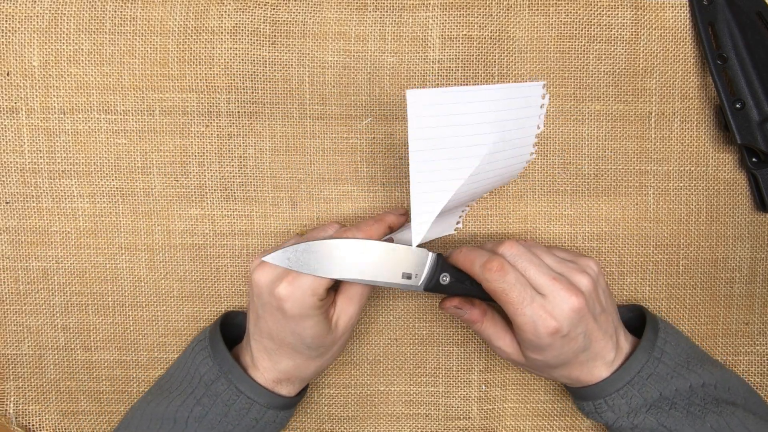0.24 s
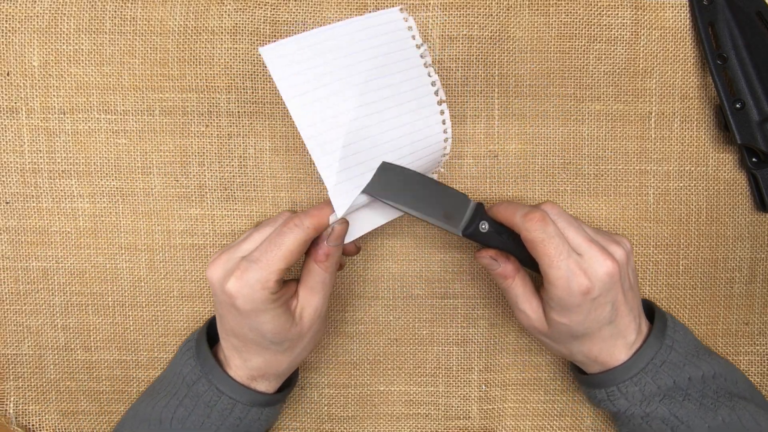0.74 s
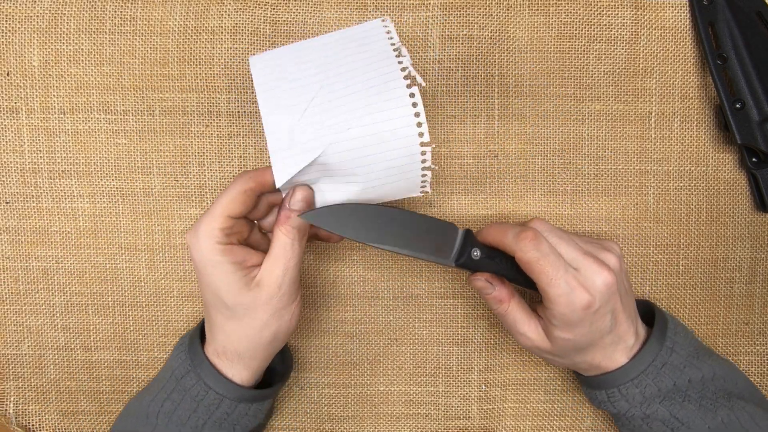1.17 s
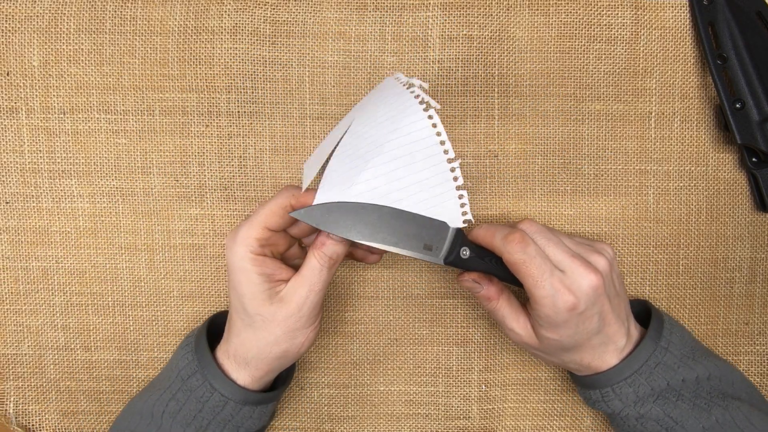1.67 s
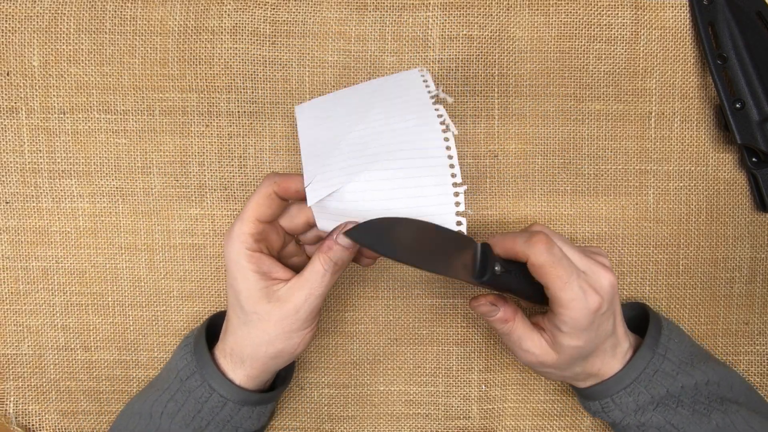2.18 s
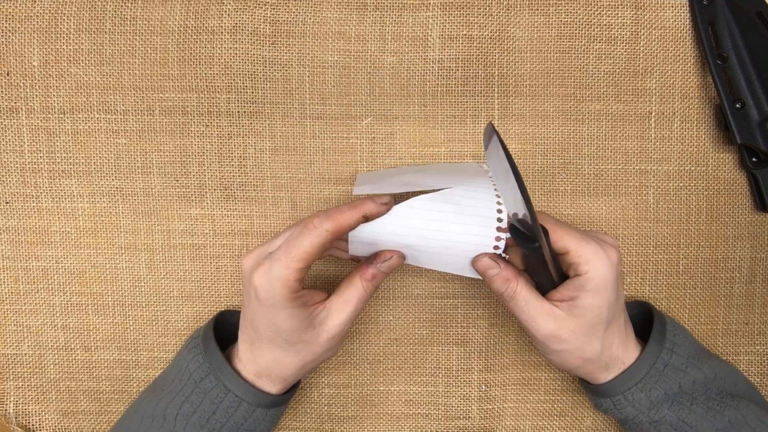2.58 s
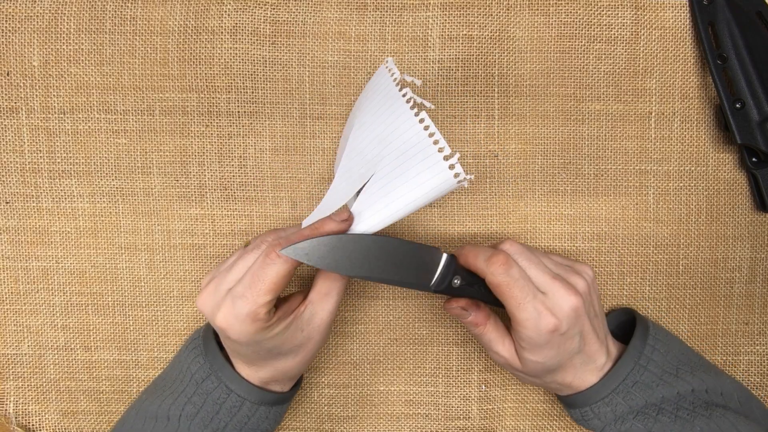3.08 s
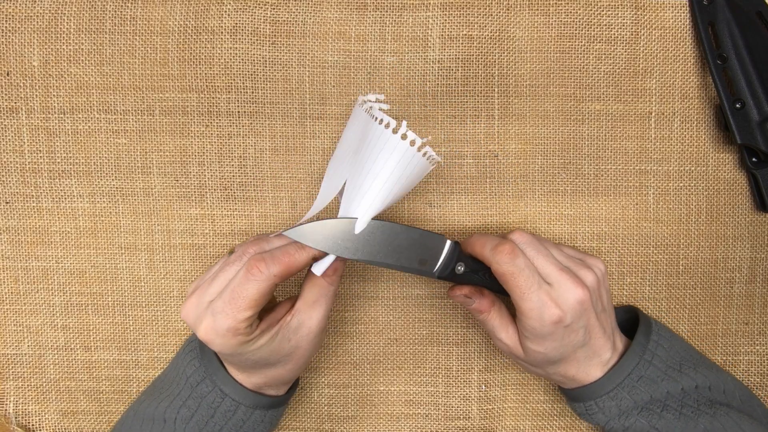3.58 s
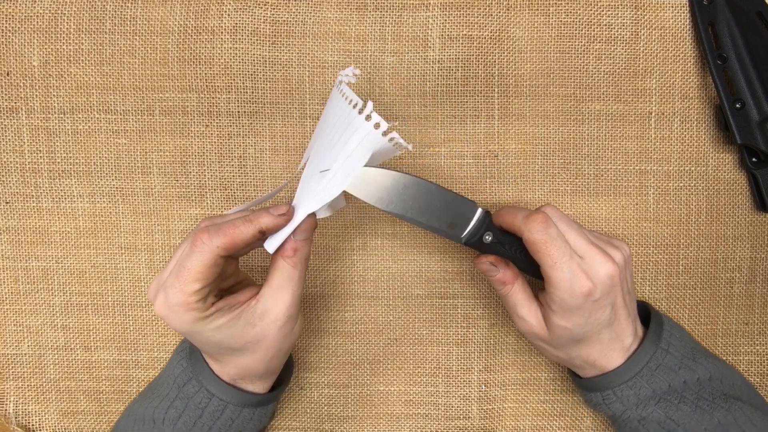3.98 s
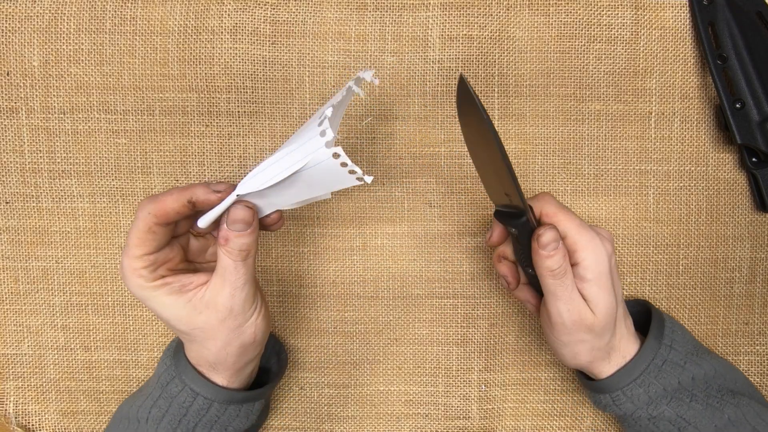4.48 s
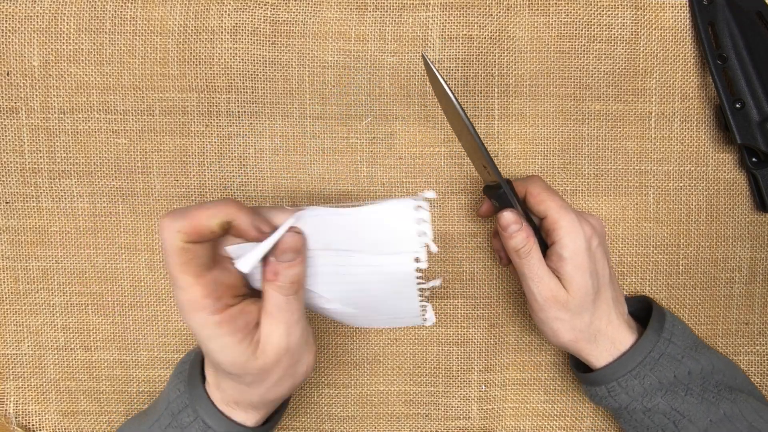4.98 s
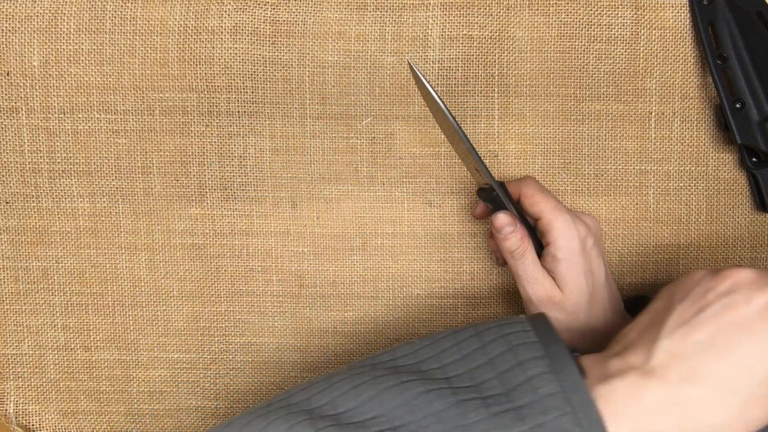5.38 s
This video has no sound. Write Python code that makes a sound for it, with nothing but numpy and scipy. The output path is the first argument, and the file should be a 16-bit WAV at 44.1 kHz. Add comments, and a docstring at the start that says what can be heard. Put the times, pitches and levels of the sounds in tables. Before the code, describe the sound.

A knife slices a hand-held sheet of notebook paper twice in crisp, rasping strokes, with paper rustling and crinkling pops between, in a quiet room.

```python
"""A low rumble with a hum lies under everything in a small room: shaped noise that swells with the arms, plus sines.
Fingers slide over a hand-held sheet of notebook paper, which rustles as dense random grains and buckles in noise pops.
Over a cloth-covered table a knife slices the sheet twice: each edge snaps fibres, heard as coloured crackle, and
rings the sheet's resonances less and less as the cut slackens it. A close pair of microphones hears it all."""
import sys
import numpy as np
from scipy import signal
from scipy.fft import rfft, irfft, next_fast_len
from scipy.io import wavfile
from scipy.ndimage import map_coordinates

SR = 44100
rng = np.random.default_rng(int(sys.argv[2]) if len(sys.argv) > 2 else 0)


def log_audio(samples):
    """Write samples as a 16-bit WAV file to the path given in sys.argv[1]."""
    # one column per channel
    frames = np.atleast_2d(samples).T
    # limit to full scale, then quantise
    limited = np.clip(frames, -1, 1)
    pcm = np.round(limited * 32767).astype(np.int16)
    wavfile.write(sys.argv[1], SR, pcm)


N = 248708
TIME = np.arange(N) / SR  # seconds


def amp(db):
    """Decibels to gain."""
    return 10 ** (np.asarray(db) / 20)


def unit(x):
    """Scale a sound to rms 1."""
    return x / np.sqrt(np.mean(x ** 2) + 1e-20)


def along(points, hz):
    """Read a curve of (frequency, value) points on a log frequency axis."""
    point_hz, values = np.transpose(points)
    return np.interp(np.log(hz + 1), np.log(point_hz + 1), values)


def wobble(rate):
    """A smooth random curve through `rate` knots a second, swinging about zero."""
    knots = rng.standard_normal(int(N * rate / SR) + 4)
    coarse_time = TIME[::32]
    return np.interp(TIME, coarse_time, map_coordinates(knots, [coarse_time * rate]))


def filtered(x, response):
    """Multiply the spectrum of x by a complex response of frequency."""
    n = x.shape[-1]
    padded = next_fast_len(n + 4096)
    spectrum = rfft(x, padded) * response(np.fft.rfftfreq(padded, 1 / SR))
    return irfft(spectrum, padded)[..., :n]


def stereo(pair, spectrum, alike):
    """Colour two unrelated signals and blend them into a left and right of set likeness, at rms 1."""
    def response(hz):
        likeness = np.clip(along(alike, hz), -0.98, 0.98)
        return amp(along(spectrum, hz)) * np.sqrt(1 + np.outer([1, -1], likeness))

    mid, side = filtered(pair, response)
    return unit(np.array([mid + side, mid - side]))


# Stereo width of the quiet room: (frequency [Hz], left-right correlation [-1 to 1])
ROOM_WIDTH = [(25, 0.49), (45, 0.47), (70, 0.81), (140, 0.054), (280, 0.2), (450, -0.69), (800, -0.89),
              (1400, -0.79), (2300, -0.47), (3600, 0.35), (6000, 0.27), (8500, -0.084)]
# Colour of the deep rumble: (frequency [Hz], relative density [dB])
DEEP_COLOUR = [(12, -46), (22, -5), (42, -3.5), (52, 7), (63, -4.5), (78, -4.5), (92, 1), (110, -8.5),
               (160, -56)]
# Colour of the upper rumble: (frequency [Hz], relative density [dB])
UPPER_COLOUR = [(80, -21), (115, -6), (145, 4.5), (185, -0.5), (235, -3.5), (270, -13.5), (315, -8.5),
                (350, -17), (450, -17.5), (700, -46)]
# Colour of the thin hiss: (frequency [Hz], relative density [dB])
HISS_COLOUR = [(300, -21), (500, -5), (800, 5.5), (1100, -8.5), (1600, -6.5), (2700, -16.5), (4800, -14.5),
               (5900, -8.5), (7000, -13), (8200, -21), (11000, -29.5), (15000, -42)]
# Steady hum: (frequency [Hz], mean rms level [dB])
HUM_TONES = [(60.5, -70), (91.7, -68.5), (147.7, -67)]
# Rumble swells as the arms move: (time [s], half length [s], deep rise [dB], upper rise [dB])
ARM_MOVES = [(0.58, 0.11, 6.5, 0.5), (0.834, 0.043, 1, 6.5), (1.42, 0.14, 3.5, -5), (2.3, 1, 1, 2),
             (3.304, 0.09, 4, 1.5), (3.465, 0.053, 15, 1), (4.918, 0.16, 10, 6), (5.414, 0.25, -7, 3)]
DEEP_DB, UPPER_DB, HISS_DB = -58, -56, -62.5  # resting levels


def room_tone():
    """Lumpy low noise swells with the arms, over a slightly unsteady hum of sines and thin hiss."""
    deep_db = DEEP_DB + 2 * wobble(22)
    upper_db = UPPER_DB + 2 * wobble(30)
    for time, half_length, deep_rise_db, upper_rise_db in ARM_MOVES:
        swell = np.exp(-((TIME - time) / half_length) ** 2)
        deep_db = deep_db + deep_rise_db * swell
        upper_db = upper_db + upper_rise_db * swell

    def noise(colour):
        return stereo(rng.standard_normal((2, N)), colour, ROOM_WIDTH)

    rumble = amp(deep_db) * noise(DEEP_COLOUR) + amp(upper_db) * noise(UPPER_COLOUR)
    hum = np.zeros(N)
    for hz, db in HUM_TONES:
        tone = np.sin(2 * np.pi * hz * TIME + 0.17 * wobble(3))
        hum += amp(db + 0.4 * wobble(5.37)) * np.sqrt(2) * tone  # sqrt(2) brings a sine to rms 1
    return rumble + amp(HISS_DB) * noise(HISS_COLOUR) + hum


# Stereo width of paper and echo: (frequency [Hz], left-right correlation [-1 to 1])
PAPER_WIDTH = [(250, 0.93), (480, -0.33), (750, 0.38), (1400, 0.062), (2100, 0.62), (3200, 0.83),
               (4400, 0.98), (5300, .55), (6500, 0.43), (8000, -0.13), (9700, 0.075), (12000, 0.55)]
# Dying of the echo: (frequency [Hz], time to fall 60 dB [s])
WALL_DECAY = [(300, 0.15), (2000, 0.3), (6000, 0.38), (14000, 0.19)]
# Colour of the walls' answer: (frequency [Hz], relative level [dB])
WALL_COLOUR = [(300, 5.5), (2500, -3), (4000, -7), (6500, -1.5), (12000, -3)]


def walls(x):
    """The small room answers with decaying noise tails; four echoes take turns, a quarter second each."""
    out = np.zeros((2, N))
    turn = np.arange(N) // (SR // 4) % 4
    for part in range(4):
        hz, t, z = signal.stft(rng.standard_normal((2, SR // 2)), SR, nperseg=256)
        decay = amp(-60 * t / along(WALL_DECAY, hz)[:, None])
        tail = signal.istft(z * decay, SR, nperseg=256)[1]
        tail = stereo(tail, WALL_COLOUR, PAPER_WIDTH)
        tail = tail / np.linalg.norm(tail[0])
        tail = np.pad(tail, ((0, 0), (SR // 200, 0)))  # 5 ms before the walls answer
        source = x.mean(axis=0) * (turn == part)
        out += signal.oaconvolve(source[None], tail, axes=1)[:, :N]
    return out


def registers(x, low_hz=1400, high_hz=4800):
    """Split a sound into low, middle and high parts, each at rms 1."""
    edges = np.array([low_hz, high_hz])[:, None, None]
    low, under_high = filtered(x, lambda hz: 1 / (1 + (hz / edges) ** 10))
    return unit(low), unit(under_high - low), unit(x - under_high)


def crackle(rate, spread_db, life):
    """Tiny noise snaps, `rate` a second at random moments: most are weak, a few stand out."""
    snaps = rng.random(N) < rate / SR
    sizes = snaps * amp(spread_db * np.minimum(rng.exponential(size=N), 4))
    # snap powers add up, and each amplitude falls to 1/e in `life` seconds
    power = signal.lfilter([1], [1, -np.exp(-2 / (life * SR))], sizes ** 2)
    return unit(np.sqrt(power) * rng.standard_normal((2, N)))


# The sheet slips through the fingers and its note climbs as the free part shortens
SLIP_START_S, SLIP_END_S, SLIP_FADE_S = 1.76, 2.82, 0.2
SLIP_HZ, SLIP_CLIMB_HZ_PER_S = 2200, 480
SLIP_CONTRAST_DB = 8.5  # from the note's peak down to the far spectrum


def flexing(x, depth_db, life, slipping=False):
    """A bending sheet keeps shifting its many small resonances; one climbs while the sheet slips."""
    hz, t, z = signal.stft(x, SR, nperseg=512)
    # random bumps, one knot every two bins and every `life` seconds
    cell = np.meshgrid(np.arange(len(hz)) / 2, t / life, indexing="ij")
    db = depth_db * map_coordinates(rng.standard_normal((len(hz), 400)), cell)
    if slipping:
        note_hz = SLIP_HZ + SLIP_CLIMB_HZ_PER_S * (t - SLIP_START_S)
        fade = np.clip(np.minimum(t - SLIP_START_S, SLIP_END_S - t) / SLIP_FADE_S, 0, 1)
        peak = 1 / (1 + ((hz[:, None] - note_hz) / 260) ** 2)
        db = db + SLIP_CONTRAST_DB * fade * (peak - 0.3)  # the rest of the spectrum dips
    return signal.istft(z * amp(db), SR, nperseg=512)[1][:, :N]


# Colour of handled paper: (frequency [Hz], relative density [dB])
PAPER_COLOUR = [(200, 9.5), (450, -9), (750, 1), (1350, 3.5), (1800, -2.5), (2350, 1), (3000, 1.5),
                (3900, 2), (4800, -3), (6400, 2.5), (7600, -3), (8200, -8.5), (11000, -24), (15000, -35)]
# Colour of a crinkle or a buckle: (frequency [Hz], relative density [dB])
POP_COLOUR = [(180, 2), (450, -10), (750, -2), (1300, -3), (2200, 3.5), (3800, 3), (4800, -1), (6400, 6.5),
              (7400, -3), (8300, -12), (11000, -27), (15000, -38)]
# Fingers slide over the sheet, high and low parts relative to the middle:
# (start [s], length before release [s], level before trim [dB], low flutter [dB], hiss [dB])
FINGER_SLIDES = [(-0.03, 0.0088, -49, 0.5, -3), (0.954, 0.035, -52, -7, 5.5), (1.021, 0.032, -49.5, -5, 4),
                 (1.13, 0.091, -53.5, -11, -4), (1.598, 0.22, -49.5, -7, -3), (1.91, 0.097, -51, -11, 1.5),
                 (2.07, 0.054, -49.5, -2, 1.5), (2.196, 0.14, -52.5, -14, 0), (2.333, 0.034, -53.5, -4, 8),
                 (2.409, 0.1, -48, -1.5, -1.5), (2.521, 0.076, -55, -1, -1.5), (2.645, 0.16, -53, -7, 3),
                 (2.864, 0.1, -53.5, -5, -1.5), (3.958, 0.087, -55.5, -7, 4.5), (4.124, 0.13, -74.5, -8, 7),
                 (4.481, 0.26, -54, -5.5, 3.5), (4.82, 0.36, -54.5, -8, 1.5), (5.007, 0.055, -50, -14, 6.5),
                 (5.202, 0.17, -51.5, -9, 4), (5.363, 0.25, -51.5, -1.5, 1.5)]
SLIDE_TRIM_DB, CRINKLE_DB = -5.0, -6.5  # crinkles are relative to the grains
SLIDE_ATTACK_S, SLIDE_RELEASE_DB_PER_S = 0.023, 171


def rustle():
    """Each finger slide rises, holds and dies away: dense fine grains with a few sharper crinkles."""
    grains = stereo(crackle(rate=8100, spread_db=0.5, life=0.00085), PAPER_COLOUR, PAPER_WIDTH)
    crinkles = stereo(crackle(rate=62, spread_db=1.5, life=0.0019), POP_COLOUR, PAPER_WIDTH)
    paper = flexing(grains + amp(CRINKLE_DB) * crinkles, depth_db=3.5, life=0.04, slipping=True)
    low, middle, high = registers(paper)
    out = np.zeros((2, N))
    for start, length, db, flutter_db, hiss_db in FINGER_SLIDES:
        rise = np.clip((TIME - start) / SLIDE_ATTACK_S, 0, 1)
        fall_db = SLIDE_RELEASE_DB_PER_S * np.maximum(TIME - start - length, 0)
        texture = middle + amp(flutter_db) * low + amp(hiss_db) * high
        out += rise * amp(db + SLIDE_TRIM_DB - fall_db) * texture
    pressure = amp(1.0 * wobble(70))
    return pressure * out


# The sheet buckles, thud and crispness relative to the middle: (time [s], level before trim [dB],
# low thud [dB], crispness [dB], length before stretch [s], panel note [Hz])
CREASES = [(0.177, -57, -1, -2, 0.0083, 2520), (0.983, -41.5, -14.5, -9, 0.0011, 4160),
           (1.2093, -36, -16, -6.5, 0.0014, 3900), (1.436, -54, -4, 1.5, 0.004, 3800),
           (1.4894, -55.5, 1.5, -2, 0.012, 2340), (1.5888, -47, 5.5, -4.5, 0.0046, 2070),
           (1.627, -49.5, 0, -7, 0.0024, 2320), (1.7537, -43.5, -20, -3.5, 0.0036, 3660),
           (1.8087, -44.5, -12, 0, 0.005, 4400), (2.024, -47, -6.5, -3.5, 0.0094, 3370),
           (2.231, -51, 2, -14, 0.0034, 2360), (2.27, -44.5, -7.5, -10, 0.0068, 3570),
           (2.312, -32.5, -6, -5.5, 0.0045, 2420), (2.368, -46, -10, 3.5, 0.0028, 2400),
           (2.4537, -43, -4.5, -1, 0.0037, 2530), (2.6357, -45.5, -2, -6, 0.0043, 2500),
           (2.921, -45, -22, -5, 0.0037, 3900), (3.234, -54, -29, -7, 0.0019, 3270),
           (3.269, -50, -19, 2.5, 0.0032, 3380), (3.96, -50, -4.5, -4, 0.0029, 3370),
           (4.0417, -45.5, -12, -3, 0.0019, 3040), (4.3, -66.5, -14, 8, 0.0016, 3600),
           (4.5115, -51.5, -2.5, 0, 0.0045, 1800), (4.6733, -50.5, -12, 6.5, 0.0019, 3650),
           (4.807, -45, -1.5, -5, 0.0097, 3350), (4.823, -41, -14, -8, 0.0026, 2620),
           (4.893, -53.5, -11, 7.5, 0.0048, 3570), (4.9348, -44, -8.5, 6.5, 0.0093, 3440),
           (4.9456, -43, -10, 2, 0.0019, 2330), (4.9952, -36, -10.5, -3.5, 0.0039, 3420),
           (5.039, -43.5, -13, 8.5, 0.0013, 2290), (5.3612, -34, -10.5, -3.5, 0.0052, 3880),
           (5.493, -46, -5, 9, 0.002, 2370)]
BUCKLE_TRIM_DB = -12.5


def buckles(stretch=2.45, rise_share=0.19, shiver_db=-15, shiver_life=0.025, panel_db=4, panel_width_hz=260):
    """The sheet flips through a crease: a sharp pop rings one panel, then the whole sheet shivers briefly."""
    t = np.arange(SR // 8) / SR
    out = np.zeros((2, N + len(t)))

    def burst(shape, colour):
        return registers(stereo(shape * rng.standard_normal((2, len(t))), colour, PAPER_WIDTH))

    for time, db, thud_db, crisp_db, length, note_hz in CREASES:
        def panel(hz):
            damping = 1j * hz * panel_width_hz
            return 1 + amp(panel_db) * damping / (note_hz ** 2 - hz * hz + damping)

        onset = 1 - np.exp(-t / (rise_share * length))  # a longer crease takes longer to give way
        low, middle, high = burst(onset * np.exp(-t / (stretch * length)), POP_COLOUR)
        pop = unit(filtered(middle, panel)) + amp(thud_db) * low + amp(crisp_db) * high
        low, middle, high = burst(onset * np.exp(-t / shiver_life), PAPER_COLOUR)
        shiver = amp(shiver_db) * (middle + amp(thud_db) * low + amp(crisp_db) * high)
        start = max(round(time * SR), 0)
        out[:, start:][:, :len(t)] += amp(db + BUCKLE_TRIM_DB) * (pop + shiver)
    return out[:, :N]


def curves(rows):
    """One value per sample for each column after the time."""
    times, *columns = np.transpose(rows)
    return [np.interp(TIME, times, column) for column in columns]


def during(rows, fade=0.027):
    """1 while a table lasts, fading over `fade` seconds outside it."""
    return np.clip(1 + np.minimum(TIME - rows[0][0], rows[-1][0] - TIME) / fade, 0, 1)


def slice_through(stroke, grip, tear, taut_db, slacken_db_per_s, gain_db, spread_db):
    """Fibres snap under the edge and ring the sheet, which slackens as the cut grows."""
    level_db, flutter_db, hiss_db = curves(stroke)

    def fibres():
        snaps = crackle(14000, spread_db, life=0.00051)
        return flexing(stereo(snaps, tear, PAPER_WIDTH), depth_db=3.5, life=0.05)

    def sheet(hz):
        return sum(amp(db) * 1j * hz * width / (centre * centre - hz * hz + 1j * hz * width)
                   for centre, width, db in grip)

    ringing = registers(unit(filtered(fibres(), sheet)))
    ring = amp(taut_db - slacken_db_per_s * np.clip(TIME - stroke[0][0], 0, 1))
    # ringing against bare snaps, at constant power
    low, middle, high = [(raw + ring * rung) / np.sqrt(1 + ring ** 2)
                         for raw, rung in zip(registers(fibres()), ringing)]
    catching = amp(0.29 * wobble(35) + 0.8 * wobble(140))  # the edge catches and runs on
    texture = middle + amp(flutter_db - 0.5) * low + amp(hiss_db) * high
    return during(stroke) * catching * amp(level_db + gain_db) * texture


# Two blade strokes, each a slow swell and a quick exit, low and high parts relative to the middle:
# (time [s], level before gain [dB], low flutter before a 0.5 dB cut [dB], edge hiss [dB])
BLADE_STROKES = [
    [(0.26, -66.5, -5, -4), (0.365, -48, -18, 2), (0.47, -50.5, -11, 3.5), (0.6, -40.5, -17, 1.5),
     (0.665, -37, -16.5, -1), (0.77, -37, -13, -2.5), (0.865, -37, -7, -1), (0.9, -44.5, -4, -3),
     (0.95, -56, -10, 4.5)],
    [(3.24, -64.5, -4.5, 1), (3.3, -50, -12, -5), (3.37, -43, -8.5, -7), (3.49, -41.5, -10.5, -5),
     (3.57, -35, -7, -1.5), (3.715, -33, -13.5, -2), (3.79, -35.5, -10.5, -2), (3.86, -39.5, -10, -2.5),
     (3.93, -59, -12, -1)],
]
# Sheet resonances in the first grip: (frequency [Hz], width [Hz], relative level [dB])
FIRST_RESONANCES = [(1260, 600, -1.5), (2032, 15, 2.5), (2450, 63, -7), (3410, 220, -4.5), (3790, 91, -1.5),
                    (5440, 60, 10), (6160, 340, 6.5), (6400, 54, 7)]
# Sheet resonances in the second grip: (frequency [Hz], width [Hz], relative level [dB])
SECOND_RESONANCES = [(790, 430, -5), (2090, 250, 5.5), (3186, 130, 5), (3434, 75, 0.5), (4528, 60, 1),
                     (4670, 68, -9), (5710, 100, -6), (6110, 130, -6), (7000, 240, -10)]
# Colour of the fibres parting in the first stroke: (frequency [Hz], relative density [dB])
FIRST_FIBRES = [(200, -12.5), (400, -10.5), (620, -9), (1000, -3), (1600, -6), (2200, 1.5), (3300, 0.5),
                (4800, -1.5), (6400, 3), (7800, 0), (8250, -8), (9700, -12), (10900, -19.5), (14300, -25)]
# Colour of the fibres parting in the second stroke: (frequency [Hz], relative density [dB])
SECOND_FIBRES = [(200, -28), (450, -12), (750, -2), (1300, -3.5), (2100, -2), (2700, -4.5), (3400, 1),
                 (4100, -5.5), (6300, -4.5), (7850, -7.5), (8350, -15), (9700, -17), (11200, -23.5),
                 (14500, -31.5)]


def scene():
    """Two strokes and the handling of the paper, with the walls' answer and the room tone."""
    first = slice_through(BLADE_STROKES[0], FIRST_RESONANCES, FIRST_FIBRES,
                          taut_db=7, slacken_db_per_s=24, gain_db=-0.5, spread_db=4.0)
    second = slice_through(BLADE_STROKES[1], SECOND_RESONANCES, SECOND_FIBRES,
                           taut_db=7, slacken_db_per_s=20, gain_db=-0.93, spread_db=2.5)
    paper = first + second + rustle() + buckles()
    return paper + amp(-9.0) * walls(paper) + room_tone()


# The two microphones differ in colour: (frequency [Hz], left minus right [dB])
MICROPHONE_TILT = [(60, -3), (150, -1), (350, -3.5), (750, -2), (1400, -1.5), (2100, 0), (3300, -1.5),
                   (4300, -1), (5500, 1.3), (7000, -1.5), (9000, -2.5), (12000, -.4)]
TOP_HZ = 15300  # band limit


def record(dry):
    """Each microphone adds half the colour difference; nothing is kept above the band limit."""
    def response(hz):
        half_tilt_db = along(MICROPHONE_TILT, hz) * np.array([[0.5], [-0.5]])
        return amp(half_tilt_db) * (hz < TOP_HZ)

    return filtered(dry, response)


dry = scene()
out = record(dry)
log_audio(out)
```